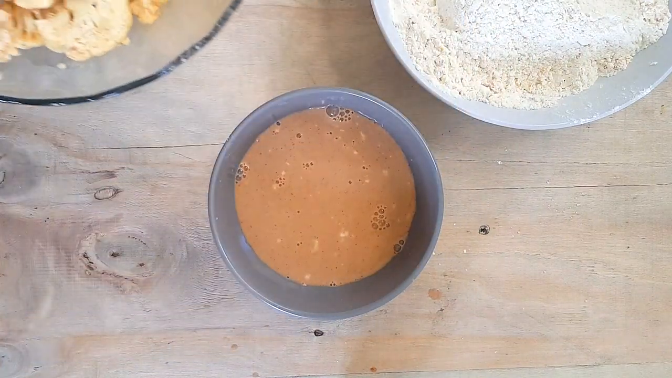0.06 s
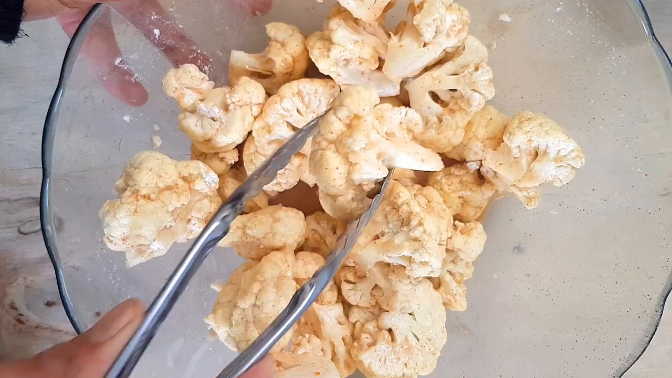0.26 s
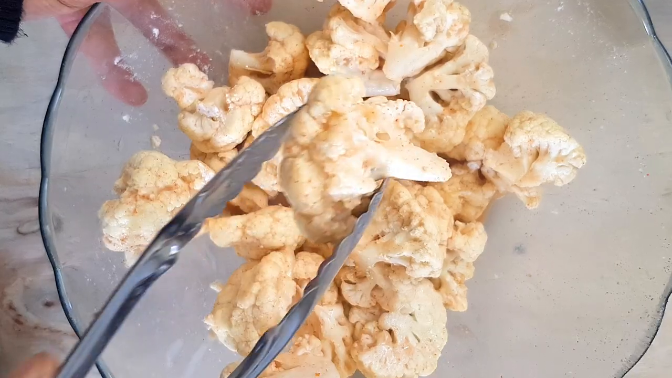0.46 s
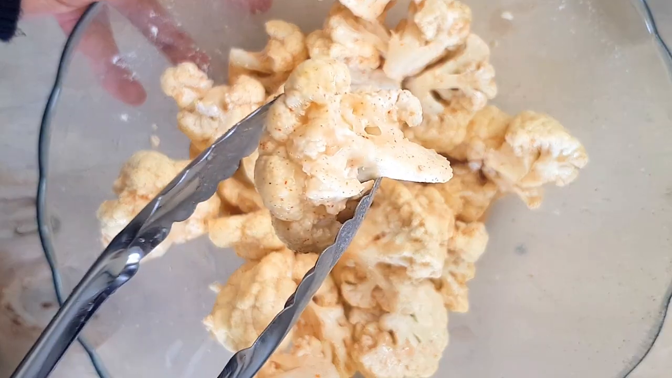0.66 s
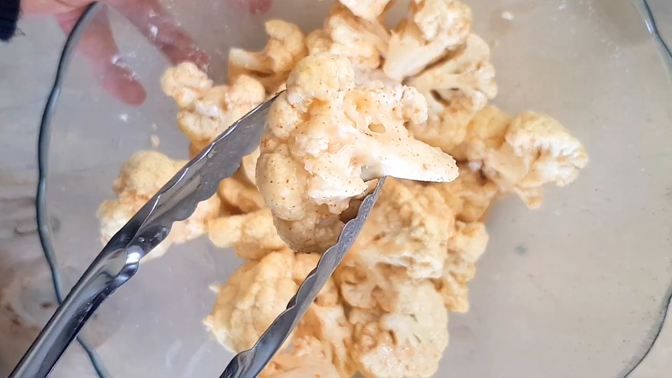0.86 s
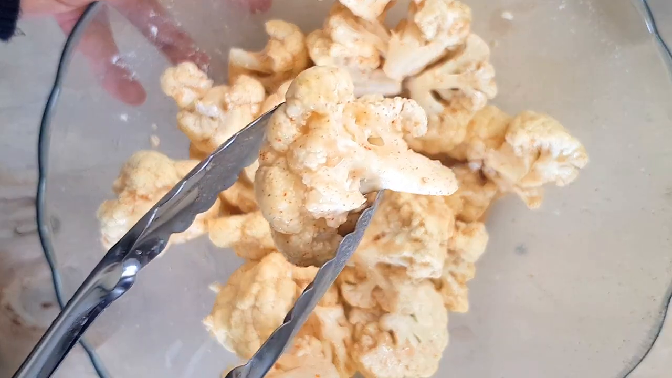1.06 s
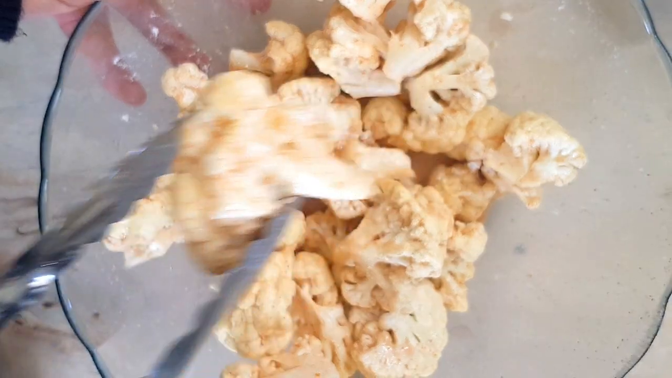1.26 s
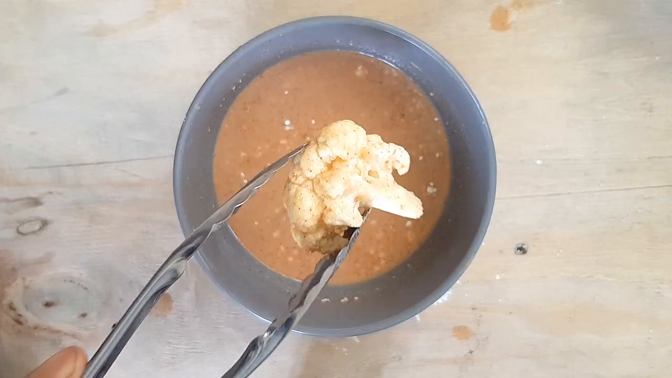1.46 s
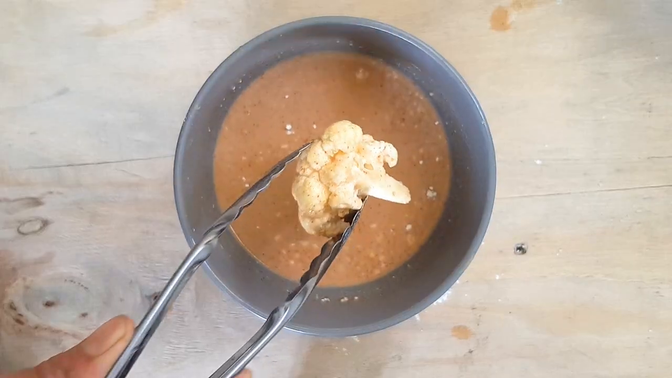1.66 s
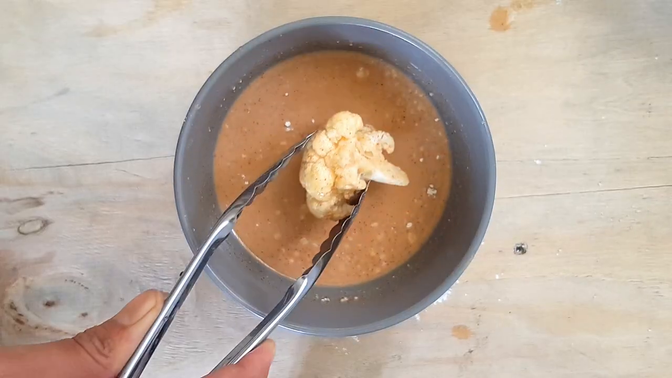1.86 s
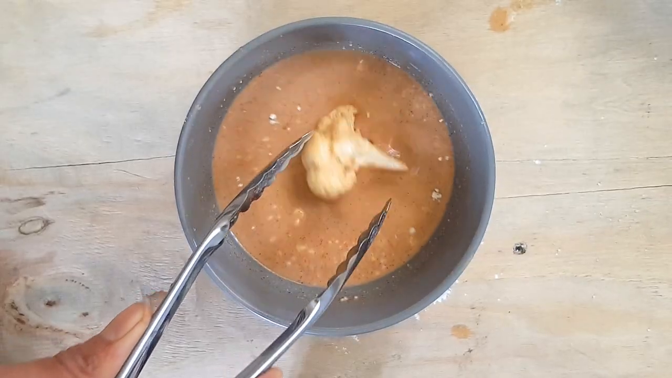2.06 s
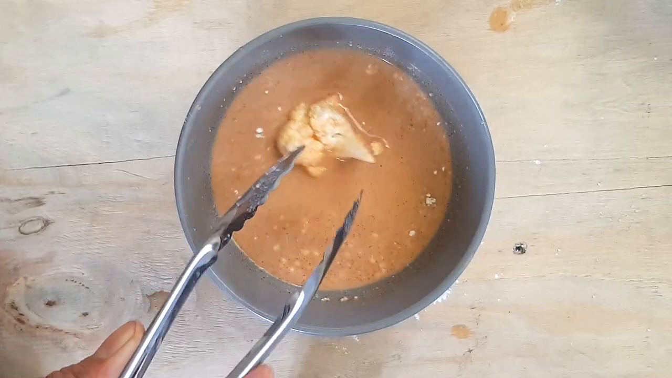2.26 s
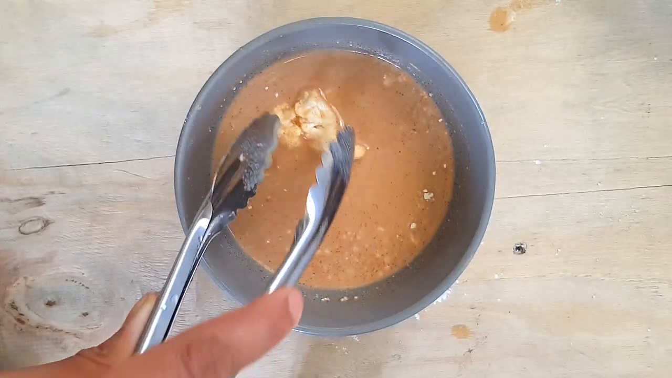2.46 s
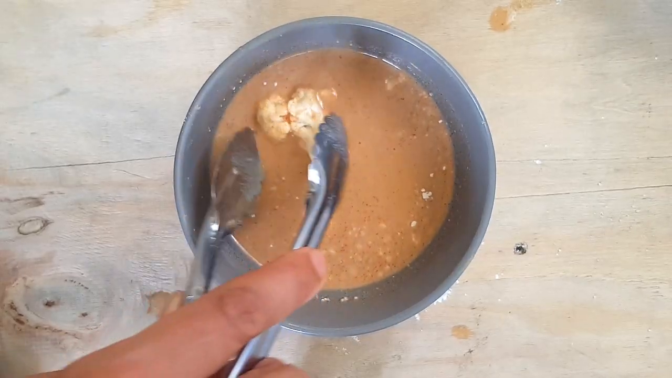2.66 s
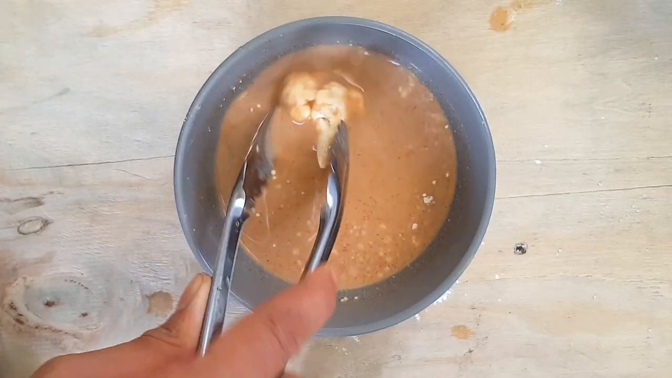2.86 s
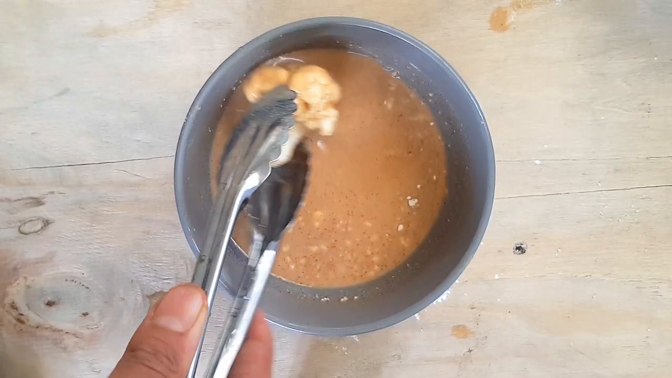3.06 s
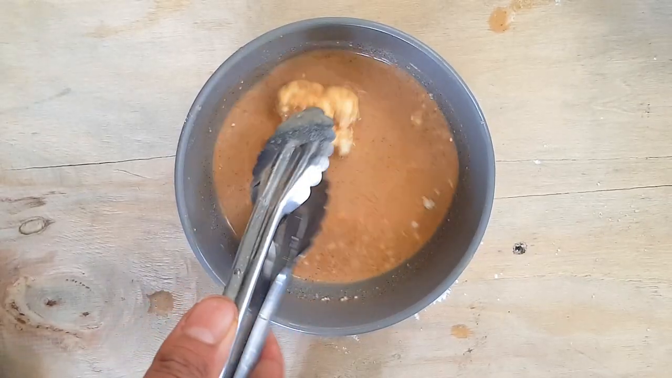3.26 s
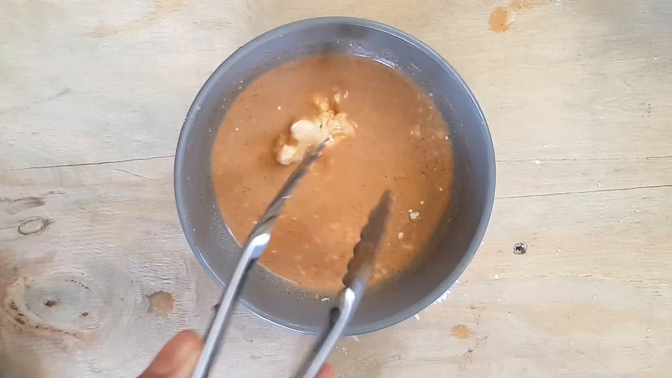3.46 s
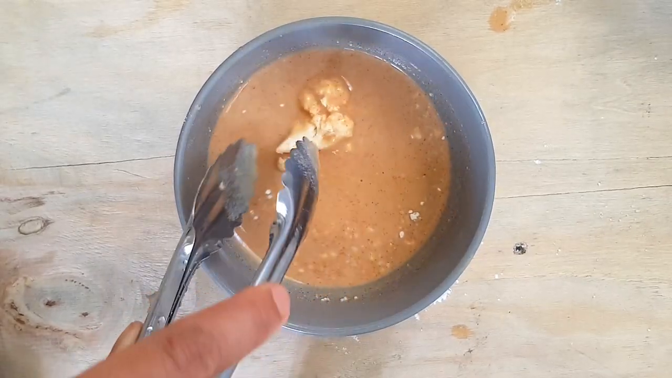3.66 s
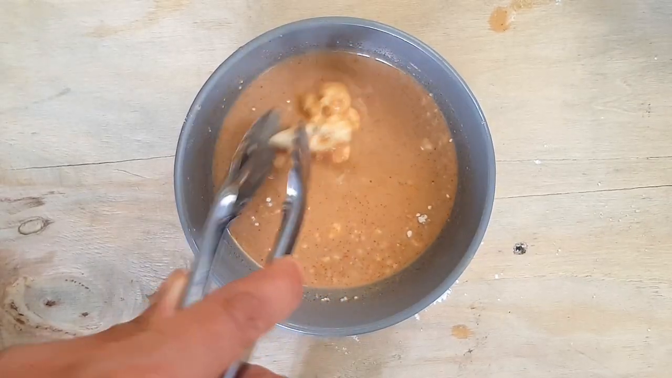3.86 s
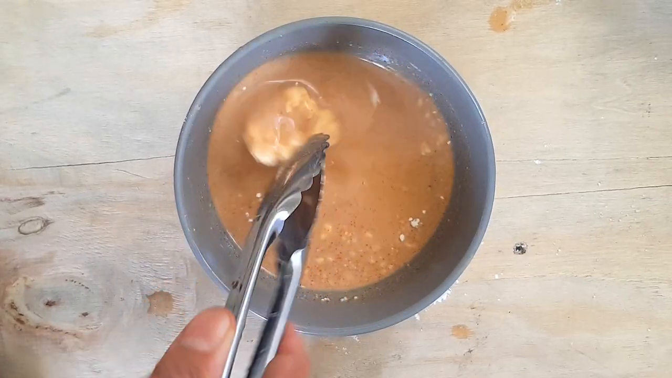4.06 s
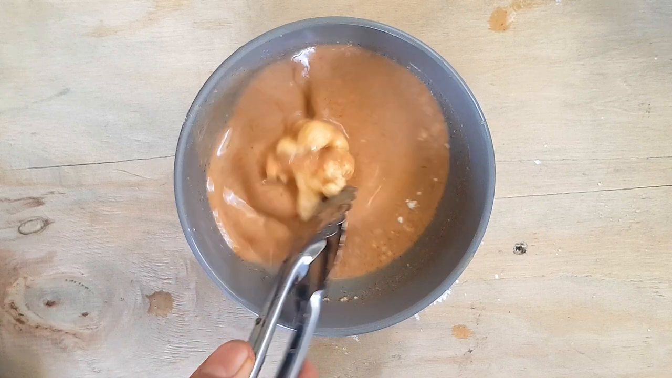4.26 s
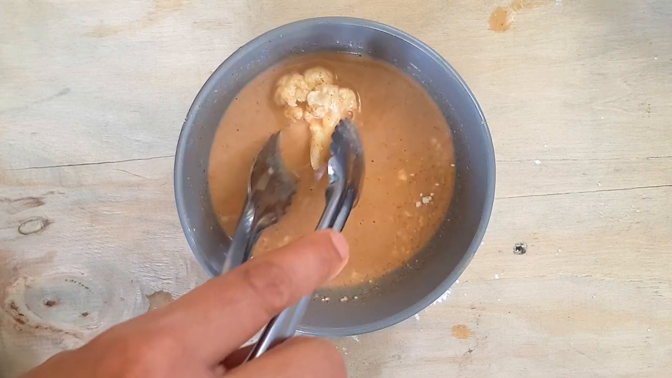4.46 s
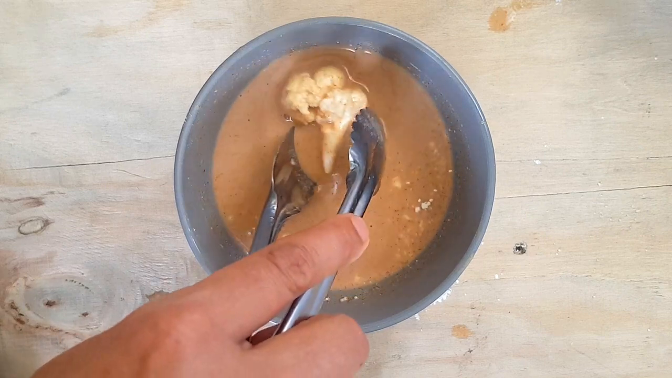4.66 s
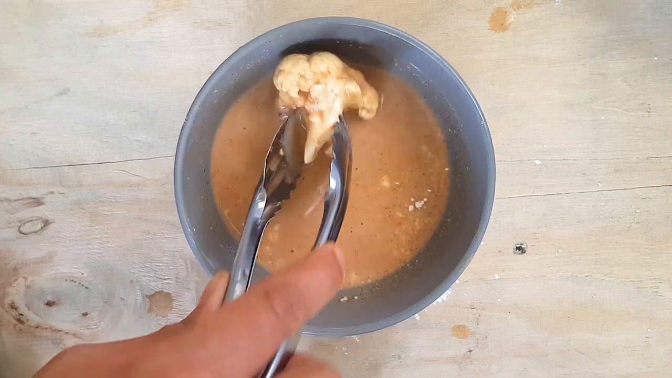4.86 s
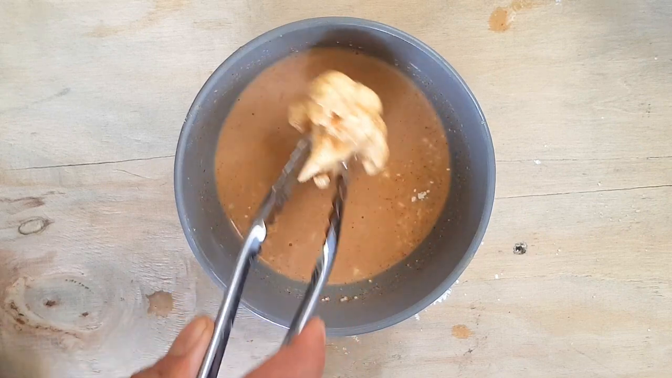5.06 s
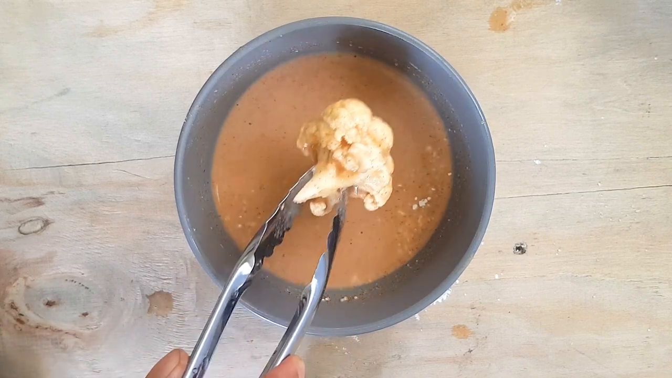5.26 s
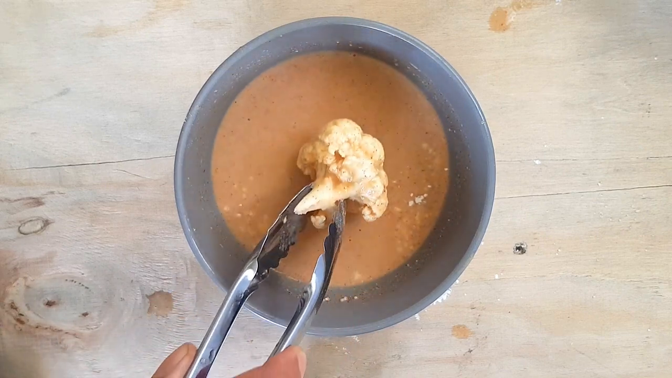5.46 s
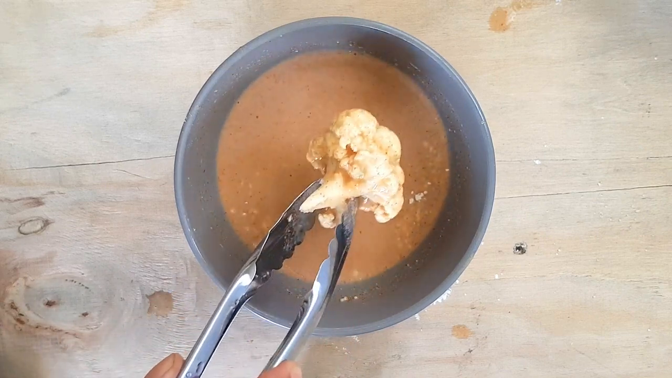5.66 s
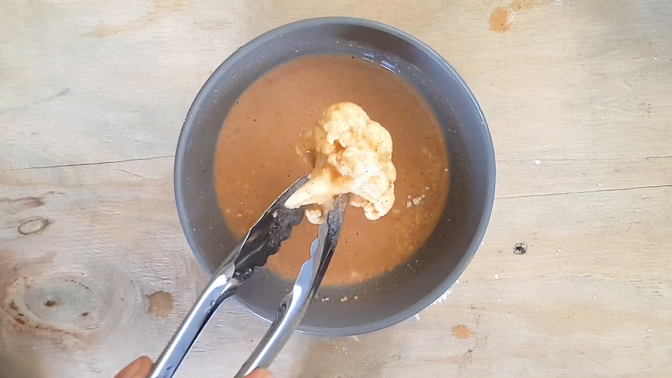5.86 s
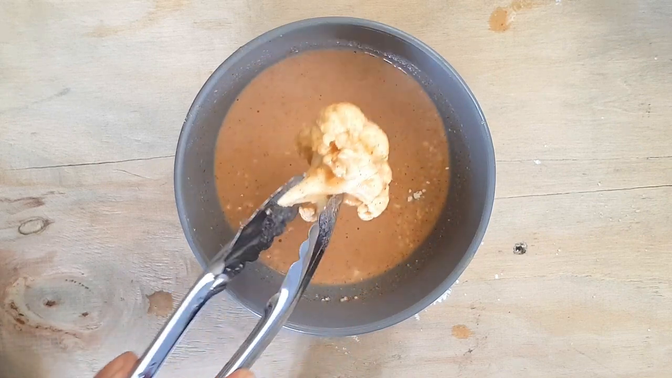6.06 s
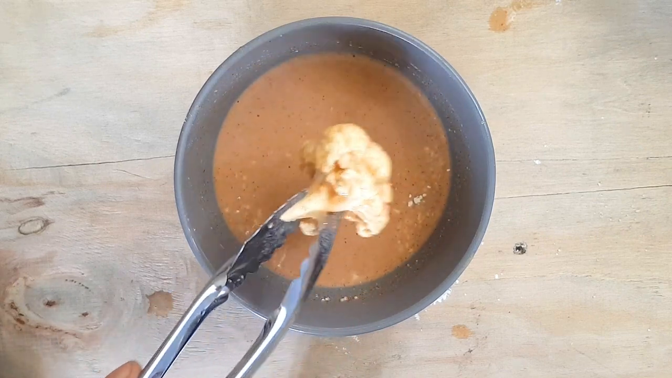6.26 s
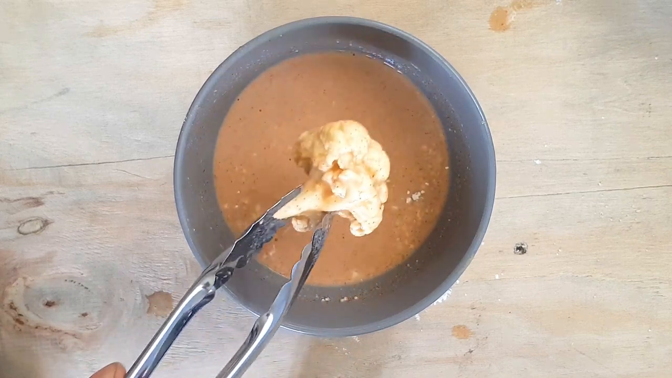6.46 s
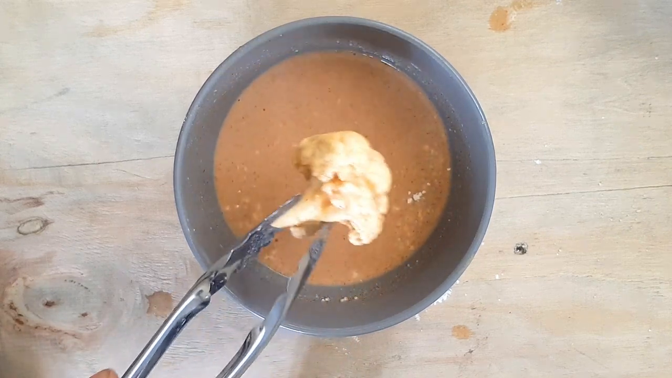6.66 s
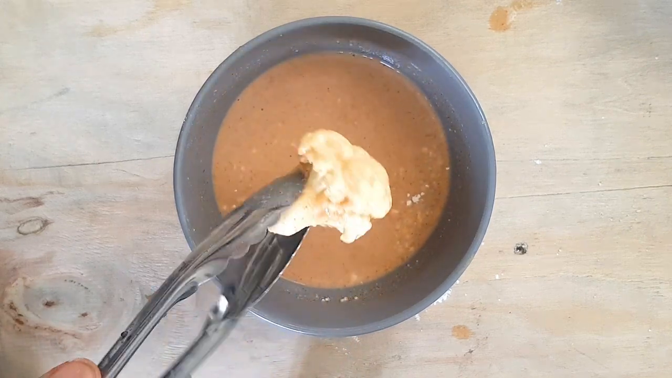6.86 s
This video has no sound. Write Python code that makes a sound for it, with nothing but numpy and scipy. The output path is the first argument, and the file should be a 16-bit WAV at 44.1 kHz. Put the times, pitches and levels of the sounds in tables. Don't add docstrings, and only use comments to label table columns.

```python
import sys
import numpy as np
from scipy import signal
from scipy.fft import rfft, irfft
from scipy.io import wavfile
from scipy.ndimage import uniform_filter1d

SR = 44100
rng = np.random.default_rng(int(sys.argv[2]) if len(sys.argv) > 2 else 0)


def makeup_ratio(level_db):
    decades = np.asarray(level_db, float) / 20
    return 10 ** decades


def dump(signal):
    limited = np.clip(np.atleast_2d(signal).T, -1, 1)
    pcm = np.round(limited * 32767).astype(np.int16)
    wavfile.write(sys.argv[1], SR, pcm)


N = 305172

# f/Hz, bandwidth/Hz, level/dB
ARM_MODES = [(3600, 900, -33.5), (4250, 100, -3), (4930, 130, -5), (5743, 400, 5), (6680, 610, 5),
             (7600, 840, 5.5), (8266, 370, -1.5), (8900, 150, 6.5), (9695, 66, 3.5), (10200, 200, 1),
             (10730, 200, -10), (11160, 250, -2), (12900, 220, -6.5), (12900, 190, -9.5),
             (14000, 320, -18.5), (13700, 370, -6.5), (15140, 300, -19.5)]
# f/Hz, bandwidth/Hz, level/dB
BODY_MODES = [(452.5, 480, -22), (932.4, 690, -23.5), (1660, 480, -15), (2236, 370, 5), (2810, 250, 0)]
# t/s, peak level/dB, brightest f/Hz, rattle/ms, treble tilt/(dB per octave)
HITS = [(1.9621, -15.5, 9850, 2.15, 9), (2.6133, -19.5, 10200, 2.4, 8.5), (3.273, -26, 8720, 3.2, -2.1),
        (3.455, -40, 4250, 2.1, 21), (3.724, -15, 6310, 2.6, 12), (3.8232, -43, 5667, 2.3, 4.5),
        (3.8458, -24, 13140, 3.7, 1.5), (4.1461, -37, 9230, 1.6, -0.8), (4.1648, -23.5, 8850, 1.05, 4.5),
        (4.186, -17.5, 5424, 1.5, -0.7), (4.2083, -38.5, 9164, 4.3, -7.5), (4.6781, -16, 9552, 2, 5.5),
        (4.6872, -19.5, 9300, 1.05, -2.5), (4.697, -26.5, 7930, 1.8, -0.6),
        (4.7564, -29.5, 5850, 1.5, -8.5), (5.03, -36.5, 9050, 0.94, 16.5), (5.0348, -36.5, 9970, 1.6, 8.5),
        (5.046, -40.5, 9840, 1.7, 12.05), (5.0522, -30, 6796, 2.1, -1.66), (5.0639, -28.5, 9120, 2.4, -0.2)]
# t/s, peak level/dB, brightest f/Hz, rattle/ms, treble tilt/(dB per octave)
CLACK = [
    (4.2632, -17.5, 5840, 1.2, 0),
    (4.2656, -8, 5500, 1.4, -1.5),
    (4.2672, -16, 8860, 0.89, -1.5),
    (4.2702, -8, 9800, 1.9, -8.5),
]
# t/s, peak level/dB, brightest f/Hz, body level/dB
TAPS = [(1.0564, -65, 3620, -68), (1.1824, -58, 3000, -67), (1.2, -55, 4070, -84),
        (1.2214, -63.5, 4050, -60.5), (1.9794, -43, 3900, -49.5), (1.9964, -58, 4790, -66),
        (2.043, -48, 5630, -70), (2.0832, -45.5, 8200, -70), (2.8544, -52, 3850, -73),
        (2.8914, -57, 3730, -80), (3.1976, -54, 7200, -65), (3.2134, -45, 13400, -66),
        (3.2213, -60, 9000, -58.5), (3.2606, -58, 5300, -63), (4.5271, -46, 9680, -69),
        (4.7794, -56, 3600, -62), (5.0994, -42.5, 9920, -61.5), (5.2692, -67, 3610, -73),
        (5.2814, -59.5, 4700, -71.5), (5.066, -49, 9700, -52)]
# t/s, peak level/dB, brightest f/Hz
TICKS = [(0.641, -58.5, 6000), (0.69, -61, 4550), (1.931, -45, 7600), (2.6924, -53, 9250),
         (2.739, -43.5, 4050), (2.7767, -45, 7080), (2.8, -47, 3820), (2.838, -49, 8180),
         (2.9642, -57, 11400), (3.048, -55.5, 7000), (3.0872, -51, 7640), (3.131, -49.5, 3820),
         (4.03, -45, 10200), (4.055, -50.5, 9800), (4.973, -48, 6960), (5.0042, -54, 10200),
         (5.1115, -48, 9700), (5.1256, -45, 9760)]
# f/Hz, level/dB
ECHO_COLOUR = [(1500, -3.5), (4000, -2.0), (5800, 1.5), (7400, -4.5), (10000, -3.0), (15000, -8.5)]
# t/s, length/s, level/dB, brightest f/Hz, focus/(dB per octave)
SCRAPES = [(1.914, 0.038, -68, 8340, 14), (1.948, 0.0044, -60, 9500, 12), (2.719, 0.037, -61, 4200, 3),
           (3.089, 0.082, -73, 7600, 40), (3.712, 0.0098, -47, 8600, 13), (3.79, 0.064, -55, 5400, 8),
           (3.842, 0.033, -57, 9000, -11), (4.019, 0.052, -64.5, 10500, 21), (4.146, 0.043, -49.5, 9000, 5),
           (4.207, 0.025, -60, 9240, 42), (4.256, 0.0083, -34, 5800, 33), (4.659, 0.034, -62, 9000, 12.5),
           (4.738, 0.029, -46, 10500, -5), (4.86, 0.064, -69.5, 9200, 43), (4.972, 0.0637, -63, 6730, 52),
           (4.974, 0.059, -60.5, 10530, 36.5), (5.012, 0.073, -55, 11000, 18), (5.069, 0.076, -62, 9840, 2)]
# t of top speed/s, time to die by 20 dB/s, sleeve swish level/dB, batter slosh level/dB
STROKES = [(0, 0.42, -73, -70), (.73, 0.4, -86, -86), (1.27, 2, -81, -96), (1.75, 0.6, -79, -67.5),
           (1.989, 0.52, -75.5, -61.5), (2.63, 0.5, -69, -67), (2.859, 0.34, -65, -62),
           (3.101, 0.16, -70, -65), (3.268, 0.35, -68, -66.5), (3.86, 0.77, -73, -68),
           (4.06, 0.15, -70.5, -65.5), (4.21, .22, -70.5, -53.5), (4.691, 0.4748, -69.5, -58),
           (5.0, 0.3, -74.5, -76.5), (5.45, 1.1, -84, -74), (5.88, .4, -84, -72.5),
           (5.99, 0.27, -77.5, -70.5), (6.25, 2.3, -92, -73), (6.43, -0.3, -77, -74),
           (6.53, 0.35, -65.5, -64.5), (6.62, 0.57, -74, -64), (6.9, 2.7, -78, -73)]
# f/Hz, level/(dB per Hz)
SWISH_COLOUR = [(1060, -42), (1800, -9.5), (2560, -13.5), (3040, -4.5), (3900, -3.5), (4590, -1.5),
                (6520, 0), (11000, -9), (14000, -26.5)]
# t/s, level/dB
CREAK = [
    (1.03, -85.5),
    (1.056, -70),
    (1.11, -93),
    (1.144, -90),
    (1.162, -69.5),
    (1.218, -64),
    (1.3, -86),
]
# f/Hz, level/dB
CREAK_COLOUR = [(900, -25.5), (1400, -1), (1750, -2.0), (2600, -7), (3300, -13.5), (4100, -6.5),
                (5200, -17.5), (7500, -28.5)]
# t/s, peak level/dB, f/Hz, t60/s
THUDS = [(0.82, -49, 126, 0.32), (1.994, -28, 108, 0.28), (2.03, -40.5, 105.6, 0.22),
         (2.736, -40.5, 87, 0.29), (3.068, -48.5, 99.5, 0.35), (3.781, -41.5, 81, 0.45),
         (3.837, -30, 82.3, 0.23), (3.91, -46.5, 93, 0.25), (4.084, -34.5, 77.5, 0.21),
         (4.115, -31.5, 83, 0.095), (4.146, -27.5, 94.7, 0.17), (4.225, -32.5, 96.9, 0.32),
         (4.3, -41.5, 103.7, 0.16), (4.522, -42.5, 86.1, 0.26), (4.678, -32.5, 91, 0.3),
         (4.745, -36, 94, 0.14), (6.615, -45.5, 99.5, 0.14)]
# t/s, level/dB, t60/s
PLOPS = [
    (1.996, -56, 0.13),
    (2.84, -68, 0.36),
    (3.2, -70, 0.4),
    (4.681, -55, 0.17),
]
# t/s, level/dB, f/Hz
BOWL_HUM = [
    (4.68, -68, 1250),
    (4.70, -68, 1245),
    (4.77, -71, 1240),
    (4.79, -75, 1100),
    (4.86, -78, 1000),
    (4.90, -95, 980),
]
# t/s, level/dB, first f/Hz, second f/Hz, first length/s
CHIRPS = [(0.231, -59.5, 4164, 3697, 0.084), (1.752, -56.5, 4030, 3500, 0.061),
          (3.223, -57.5, 4080, 3660, 0.048), (4.981, -57.5, 4132, 3472, 0.04)]
# t/s, level/dB, f/Hz, length/s
TWEETS = [(.63, -76, 6500, .04), (.85, -73, 6350, .04), (1.075, -74, 6450, .04), (1.31, -78, 6500, .03),
          (1.42, -75, 4900, .02), (5.36, -78, 8400, .02), (5.46, -78, 8400, .02), (5.57, -78, 8400, .02),
          (5.67, -78, 8400, .02), (5.77, -76, 8400, .02), (5.9, -77, 8400, .02), (5.975, -75, 8400, .02),
          (5.98, -78, 4700, .03), (6.08, -76, 8400, .02), (6.81, -80, 1800, .03)]
# f/Hz, level/(dB per Hz)
HISS = [(15, -32.0), (25, -13.5), (48, 8), (70, -1.5), (210, -8.5), (342, -16.5), (460, -18), (555, -23.0),
        (707, -24.5), (1630, -31.0), (4080, -36.5), (6280, -32), (9410, -32), (15700, -28.5),
        (16000, -74.5)]
# f/Hz, level/(dB per Hz)
HISS_LAST = [(15, -45), (25, -23.5), (75, -9.5), (220, -4), (380, -14.5), (600, -42), (1200, -58),
             (2500, -44), (4000, -48.5), (5000, -36.5), (8400, -28.5), (11000, -41), (15600, -45),
             (16000, -83)]
# f/Hz, side minus mid level/dB
SPREAD = [(60, -14.5), (110, -12), (200, -11.5), (380, -13), (700, -1.5), (1290, -0.5), (2380, -0.5),
          (4400, 1.5), (8120, -7.5), (15000, 3)]
CUTS = [0, 4.372, 5.848, 6.92]

HIT_BODY_DB, CLACK_BODY_DB, TICK_BODY_DB = -30.5, -19, -32
LIGHT_RATTLE_MS, LIGHT_TILT_DB, LIGHT_FLAT_HZ = 1.2, 8, 6460
SWISH_RISE_SHARE, SLOSH_RISE_SHARE = 0.45, 0.15
IDLE_SWISH_DB, IDLE_SLOSH_DB = -93.5, -82
SHAKE_DB, SHAKE_LAG_S, IDLE_SHAKE_DB = 8, 0.02, -75
KNOCK_DB, KNOCK_T60_S = -24.5, 0.29
BREAK_S, HOLD_S, DROOP_S = 0.03, 0.098, 0.076
HISS_DB, HISS_LAST_DB = -71, -71


def clicks():
    hz, width, db = np.transpose(ARM_MODES)
    near, send = np.zeros(N), np.zeros(N)
    t_ms = np.arange(600) / SR * 1000
    thin = highpass(3, 3100)
    for s, peak_db, bright_hz, body_db, rattle_ms, tilt_db in contacts():
        level_luck, pitch_luck = rng.standard_normal((2, len(hz)))
        grit = rng.standard_normal(len(t_ms))
        push = grit * np.exp(-t_ms / max(rattle_ms, .1)) * np.minimum(t_ms / .35, 1)
        spot_db = (1.5 + 0.54 * peak_db) * np.abs(np.log2(hz / bright_hz))
        spot_db = spot_db + tilt_db * np.log2(np.minimum(hz, 11000) / 7000)
        own_hz = hz * (1 + .008 * pitch_luck)
        modes = ring(own_hz, 160 + 1.1 * width, db + spot_db + 2.5 * level_luck)
        voice = signal.sosfilt(thin, np.convolve(push, modes))
        dull = signal.butter(2, min(4500 + 1.1 * bright_hz, .4 * SR), fs=SR, output="sos")
        voice = signal.sosfilt(dull, voice)
        blur = signal.sosfilt(thin, np.convolve(push[:40], ring(hz, 450 + width, db + spot_db)))
        blur = np.pad(blur, (0, len(voice) - len(blur)))
        blur = blur * np.std(voice) * np.sqrt(len(voice) / np.sum(blur ** 2))
        body = np.diff(np.convolve(push, ring(*np.transpose(BODY_MODES))), prepend=0)
        body = makeup_ratio(body_db + 8.5) * body / np.abs(body).max()
        gain = makeup_ratio(peak_db) / np.abs(voice).max()
        add(near, s, gain * voice + body)
        limit = makeup_ratio(-.15 * (peak_db + 22.0))
        add(send, s, (gain * blur + 0.77 * body) * limit)
    return near, send


def contacts():
    touches = []
    light = TAPS + [(s, db, hz, db + TICK_BODY_DB) for s, db, hz in TICKS]
    for s, db, hz, body_db in light:
        tilt_db = LIGHT_TILT_DB * np.log2(hz / LIGHT_FLAT_HZ)
        touches.append((s, db, hz, body_db, LIGHT_RATTLE_MS, tilt_db))
    for table, under_db in [(HITS, HIT_BODY_DB), (CLACK, CLACK_BODY_DB)]:
        for s, db, hz, rattle_ms, tilt_db in table:
            body_db = db + under_db + 0.33 * (db + 21.5)
            touches.append((s, db, hz, body_db, rattle_ms, tilt_db))
    return sorted(touches)


def room_echo(send):
    echo = shaped(tail(0.25, 0.0013, .012), ECHO_COLOUR)
    edges = shot_edges()
    shots = []
    for a, b in zip(edges, list(edges[1:-1]) + [N]):
        shots.append(signal.fftconvolve(send[a:b], echo)[:b - a])
    return np.concatenate(shots)


def scrapes():
    hz, width, db = np.transpose(ARM_MODES)
    out = np.zeros(N)
    for s, length, level_db, bright_hz, focus_db in SCRAPES:
        slips, pressure = rng.standard_normal((2, int(.1 * SR)))
        u = np.minimum(np.arange(len(slips)) / (length * SR), 1)
        clumps = makeup_ratio(3.8 * uniform_filter1d(pressure, size=36) * 6.6)
        push = slips * clumps * np.sin(np.pi * u) ** 1.7
        mode_db = .5 * db - focus_db * np.abs(np.log2(hz / bright_hz))
        sound = band(np.convolve(push, ring(hz, 150 + 0.28 * width, mode_db)), 3100, 13000)
        add(out, s, sound * makeup_ratio(level_db) / np.std(sound[:int(length * SR)]))
    return out


def swish():
    voice = shaped(rng.standard_normal(N) * makeup_ratio(1.8 * walk(53)), SWISH_COLOUR)
    return voice / np.std(voice) * strokes(IDLE_SWISH_DB, column=2, rise=SWISH_RISE_SHARE) * makeup_ratio(2.0)


def slosh():
    wet = band(rng.standard_normal(N) * makeup_ratio(2.2 * walk(30)), 140, 720)
    return wet * strokes(IDLE_SLOSH_DB, column=3, rise=SLOSH_RISE_SHARE) * makeup_ratio(-5.5)


def spring_creak():
    creak = shaped(rng.standard_normal(N) * makeup_ratio(2.0 * walk(70)), CREAK_COLOUR)
    return creak / np.std(creak) * makeup_ratio(curve([(1.02, -120)] + CREAK + [(1.31, -120)]))


def table_thuds():
    swings, raps = np.zeros(N), np.zeros(N)
    t = np.arange(int(.2 * SR)) / SR
    for s, peak_db, hz, t60_s in THUDS:
        width_hz = np.log(1000) / np.pi / np.clip(t60_s, .04, .2)
        swing = ring(hz * np.array([1, 1.27, 2.5]), width_hz * np.array([1, 1.2, 2.5]),
                     np.array([0.1, -6, -12]), seconds=.4)
        swing = np.convolve(swing, np.hanning(int(0.006 * SR)))
        add(swings, s, swing * makeup_ratio(peak_db) / np.abs(swing).max())
        decay = makeup_ratio(peak_db + KNOCK_DB - 60 * t / KNOCK_T60_S)
        add(raps, s, band(rng.standard_normal(len(t)), 100, 390) * decay * np.minimum(t / .004, 1))
    return raps + signal.sosfilt(highpass(2, 45), swings)


def table_tremble():
    rumble = band(band(rng.standard_normal(N), 34, 120), 34, 120) * makeup_ratio(SHAKE_DB)
    work = strokes(IDLE_SHAKE_DB - SHAKE_DB, column=3, rise=SLOSH_RISE_SHARE, lag_s=SHAKE_LAG_S)
    return rumble * work * makeup_ratio(2 * walk(9))


def plops():
    out = np.zeros(N)
    t = np.arange(int(.2 * SR)) / SR
    for s, db, t60_s in PLOPS:
        slap = band(rng.standard_normal(len(t)), 350, 1700)
        add(out, s, slap * makeup_ratio(db - 60 * t / t60_s) * np.minimum(t / (0.033 * t60_s), 1))
    return out


def bowl():
    flutter = .7 * (walk(160) + 1j * walk(160)) + .9
    turn = np.exp(2j * np.pi * np.cumsum(curve(BOWL_HUM, column=2)) / SR)
    return (flutter * turn).real * makeup_ratio(curve([(4.675, -130, 0)] + BOWL_HUM + [(4.95, -130, 0)]))


def birds():
    song = np.zeros(N)
    # s, dB, start Hz, end Hz, length s, warble Hz
    notes = [(s, db, 1.02 * hz, .98 * hz, length, 330) for s, db, hz, length in TWEETS]
    for s, db, high_hz, low_hz, first_s in CHIRPS:
        notes.append((s, db, 1.01 * high_hz, .99 * high_hz, first_s, 340))
        notes.append((s + BREAK_S, db + 0.17, 1.03 * low_hz, .995 * low_hz, HOLD_S, 150))
        notes.append((s + BREAK_S + .015, db - 4.5, low_hz, .84 * low_hz, DROOP_S, 300))
    for s, db, start_hz, end_hz, length, warble_hz in notes:
        u = np.arange(int(length * SR)) / (length * SR)
        hz = start_hz + (end_hz - start_hz) * u ** 1.46
        hz = hz + warble_hz * u * np.sin(2 * np.pi * 60 * u * length)
        add(song, s, makeup_ratio(db) * np.sin(np.pi * u) ** .5 * np.sin(2 * np.pi * np.cumsum(hz) / SR))
    return [signal.fftconvolve(song, tail(0.39, 0, 0.00094))[:N] for _ in range(2)]


def hiss(points, db):
    mid = shaped(rng.standard_normal(N), points)
    side = shaped(shaped(rng.standard_normal(N), points), SPREAD)
    audible = signal.sosfilt(highpass(4, 200), mid)
    return np.array([mid, side]) * makeup_ratio(db) / np.std(audible)


def strokes(idle_db, column, rise, lag_s=0):
    t = np.arange(0, N, 64) / SR
    power = makeup_ratio(2 * idle_db)
    for row in STROKES:
        u = (t - row[0] - lag_s) / max(row[1], .02)
        power = power + makeup_ratio(2 * (row[column] - 20 * np.maximum(u, -u / rise)))
    return np.interp(np.arange(N) / SR, t, np.sqrt(power))


def ring(hz, width_hz, db, seconds=.025):
    t = np.arange(int(seconds * SR))[:, None] / SR
    decay = np.exp(-np.pi * width_hz * t)
    return (makeup_ratio(db) * decay * np.sin(2 * np.pi * hz * t)).sum(axis=1)


def tail(t60_s, delay_s, rise_s):
    t = np.arange(int(.6 * SR)) / SR
    h = rng.standard_normal(len(t)) * makeup_ratio(-60 * t / t60_s) * np.clip((t - delay_s) / rise_s, 0, 1)
    return h / np.sqrt(np.sum(h ** 2))


def shaped(x, points):
    hz, db = np.transpose(points)
    f = np.maximum(np.arange(len(x) // 2 + 1) * SR / len(x), 1)
    return irfft(rfft(x) * makeup_ratio(np.interp(np.log(f), np.log(hz), db)), len(x))


def band(x, lo_hz, hi_hz):
    y = signal.sosfilt(signal.butter(2, [lo_hz, min(hi_hz, .45 * SR)], "band", fs=SR, output="sos"), x)
    return y / np.std(y)


def highpass(order, hz):
    return signal.butter(order, hz, "high", fs=SR, output="sos")


def walk(rate):
    k = int(SR / rate)
    w = uniform_filter1d(np.repeat(rng.standard_normal(N // k + 1), k)[:N], k)
    return w / np.std(w)


def curve(table, column=1):
    rows = np.array(table)
    return np.interp(np.arange(N) / SR, rows[:, 0], rows[:, column])


def add(out, s, x):
    i = int(s * SR)
    out[i:i + len(x)] += x[:N - i]


def shot_edges():
    return (np.array(CUTS) * SR).astype(int)


def scene():
    near, send = clicks()
    room = room_echo(send)
    in_first_shots = np.arange(N) < shot_edges()[-2]
    floor_mid, floor_side = np.where(in_first_shots, hiss(HISS, HISS_DB), hiss(HISS_LAST, HISS_LAST_DB))
    loudness = uniform_filter1d(np.abs(near), size=260)
    ahead = np.roll(loudness, -int(.007 * SR))
    duck = 1 / (1 + 250 * np.maximum(ahead - loudness, 0))
    rubbing = swish() + slosh() + spring_creak()
    table = table_thuds() + table_tremble() + plops()
    bird, bird_side = birds()
    mid = near + duck * (makeup_ratio(-12.5) * room + scrapes() + rubbing + floor_mid) + table + bowl() + bird
    near_side = makeup_ratio(-25.5) * np.diff(near, prepend=0) + makeup_ratio(-34) * band(near, 1500, 3000) * np.std(near)
    side = duck * floor_side + bird_side + near_side
    return np.array([mid + side, mid - side])


def low_pass(x):
    return signal.sosfilt(signal.butter(12, 16640, fs=SR, output="sos"), x)


def record(dry):
    mix = signal.sosfilt(signal.ellip(6, .3, 28, 15700, fs=SR, output="sos"), dry)
    return low_pass(mix)


dry = scene()
out = record(dry)
dump(out)
```